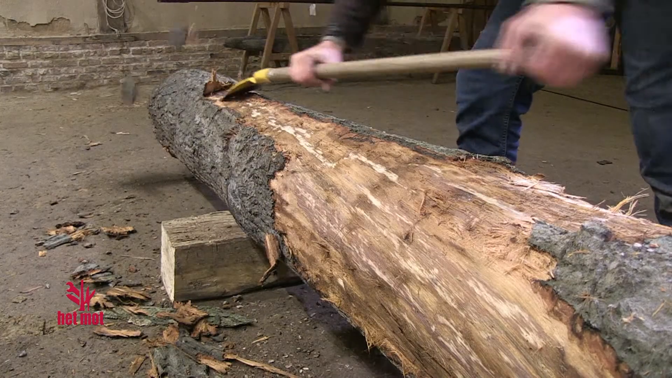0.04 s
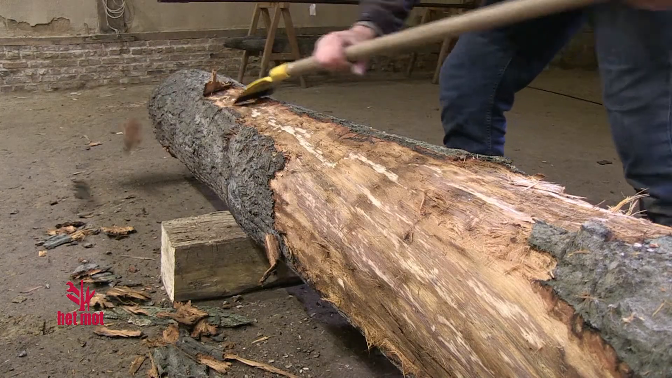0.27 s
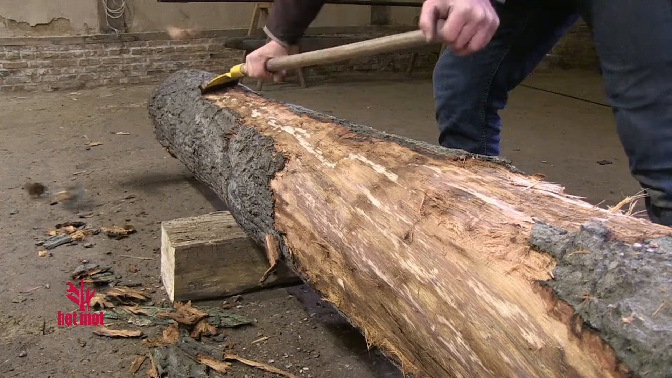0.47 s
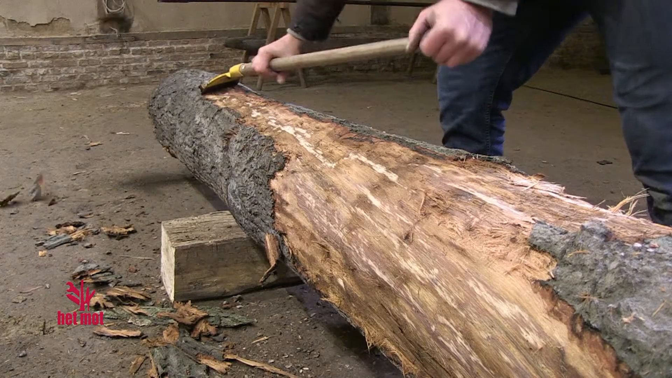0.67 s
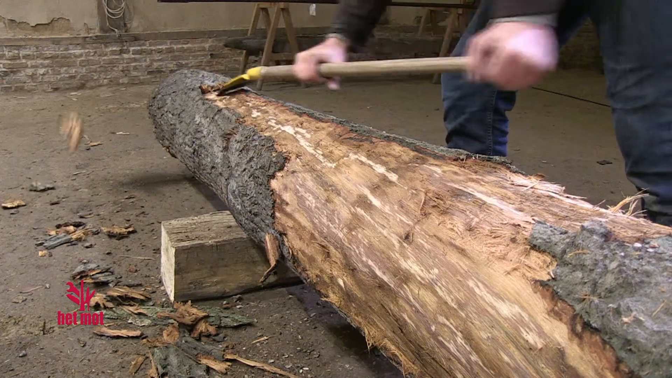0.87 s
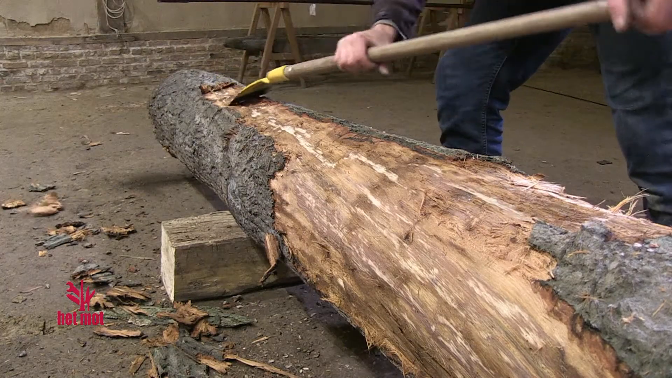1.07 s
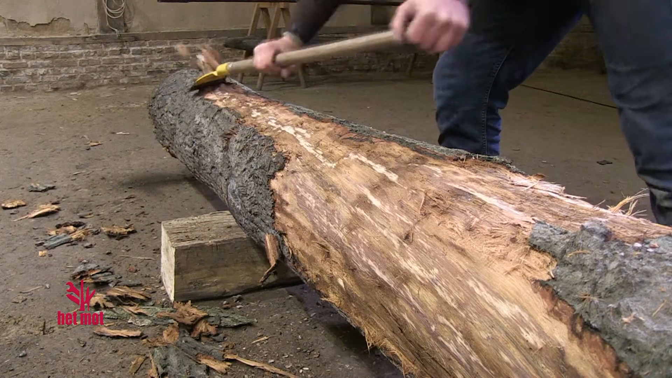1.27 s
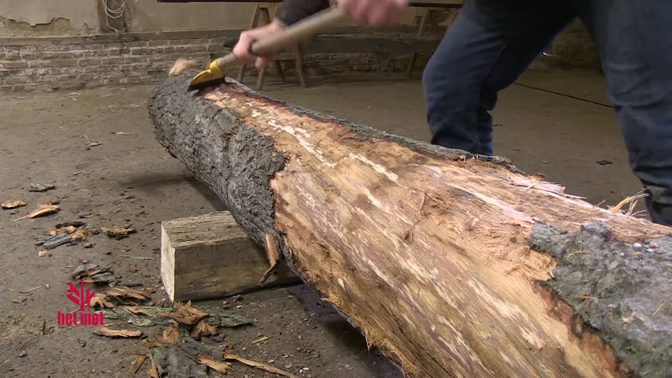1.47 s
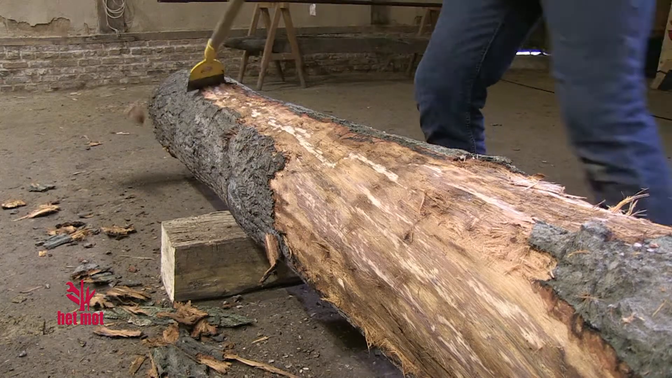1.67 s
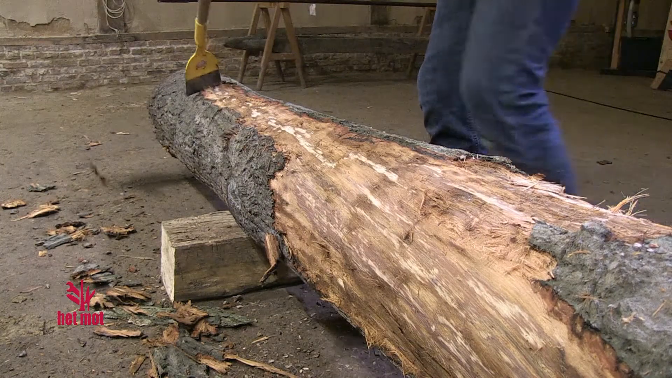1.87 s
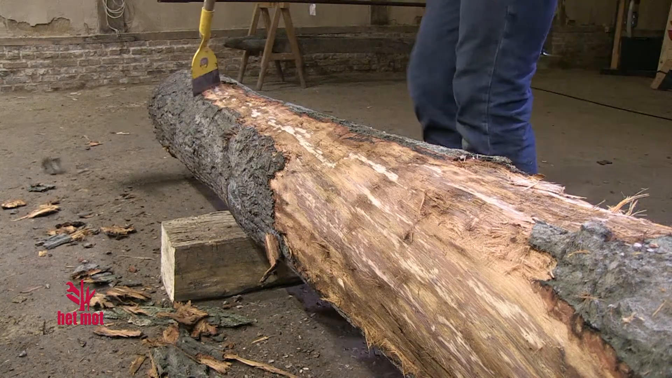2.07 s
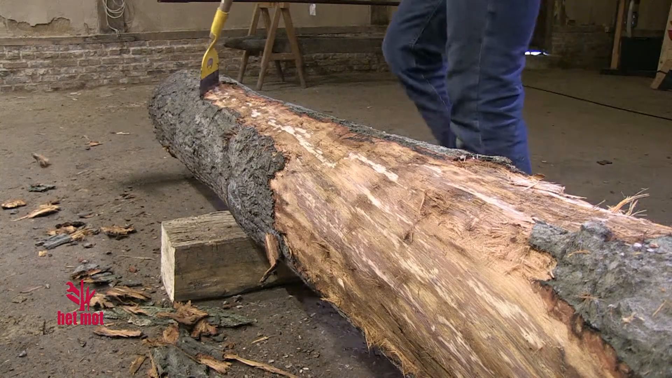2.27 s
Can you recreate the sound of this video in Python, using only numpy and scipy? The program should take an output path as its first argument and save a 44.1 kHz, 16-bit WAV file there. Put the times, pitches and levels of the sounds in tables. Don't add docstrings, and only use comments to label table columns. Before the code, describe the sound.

Two short, rasping spade pushes tear crackling bark off a log, each with a metallic squeal and dull knock; light back-drags precede them, then chips tick and shoes scuff quietly. Close microphone, hard-walled room.

```python
import sys
import numpy as np
from scipy import signal
from scipy.fft import rfft, irfft
from scipy.io import wavfile
from scipy.ndimage import uniform_filter1d

SR = 44100
rng = np.random.default_rng(int(sys.argv[2]) if len(sys.argv) > 2 else 0)


def volts_from_decibels(level):
    exponent = np.asarray(level, float) / 20
    return 10 ** exponent


def materialize(psi):
    bounded = np.clip(np.atleast_2d(psi).T, -1, 1)
    quanta = np.round(bounded * 32767).astype(np.int16)
    wavfile.write(sys.argv[1], SR, quanta)


N = 101430


def evened(x):
    return x / np.sqrt(np.mean(x ** 2) + 1e-20)


def waver(n, length):
    return evened(uniform_filter1d(rng.standard_normal(n), length))


def highpass(x, order, hz):
    return signal.sosfilt(signal.butter(order, hz, "high", fs=SR, output="sos"), x)


def thin(x):
    return highpass(x, 4, 100)


def read(points, hz):
    f, value = np.transpose(points)
    return np.interp(np.log(hz + 1), np.log(f + 1), value)


def colour(x, points):
    hz = abs(np.fft.fftfreq(4096, 1 / SR))
    octaves_below = np.maximum(np.log2(points[0][0] / (hz + 1)), 0)
    log_gain = np.log(volts_from_decibels(read(points, hz) - 4.5 * octaves_below) + 1e-5)
    taps = np.fft.ifft(np.exp(log_gain - 1j * signal.hilbert(log_gain).imag)).real[:2048]
    return signal.oaconvolve(x, taps / np.linalg.norm(taps))[:N]


def ring(x, modes, damp=0.59, shift_db=0., shift_s=.02):
    t = np.arange(3000) / SR
    taps = []
    for hz, width, db in modes:
        decay = t * np.exp(-5 * width * damp * t)
        taps.append(volts_from_decibels(db) * width ** 2 * decay * np.sin(2 * np.pi * hz * t))
    taps = np.array(taps)
    knots = np.arange(0, N / SR + 1, shift_s)
    drift = rng.standard_normal((len(knots), len(modes)))
    spot = np.array([np.interp(np.arange(N) / SR, knots, volts_from_decibels(shift_db * d)) for d in drift.T])
    fed = x * spot / np.sqrt((spot ** 2).mean())
    return signal.oaconvolve(fed, taps / np.linalg.norm(taps), axes=1)[:, :N].sum(0)


def grit(per_s, spread_db, lumpy_db, lump_s):
    hit = rng.random(N) < per_s / SR
    size = np.minimum(rng.exponential(1, N), 4)
    sign = rng.choice([-1., 1.], N)
    lump = waver(N, max(int(lump_s * SR), 1))
    return evened(hit * sign * volts_from_decibels(spread_db * size + lumpy_db * lump))


def force(strokes):
    t, main, second = np.arange(N) / SR, np.zeros(N), np.zeros(N)
    for rows in strokes:
        s, db, more_db = np.transpose(rows)
        level = np.interp(t, s, db, -140, -140)
        main += volts_from_decibels(level)
        second += volts_from_decibels(level + np.interp(t, s, more_db))
    return main, second


# (frequency [Hz], density [dB per Hz])
HUM_SPECTRUM = [(12, -20.5), (20, 5), (313, 2.5), (873, -12), (3700, -16.5), (4370, -19), (5610, -25),
                (14000, -25), (15200, -50.5)]
HUM_DB = -56


def hum():
    hz = np.fft.rfftfreq(N, 1 / SR)
    spectrum = rfft(rng.standard_normal(N)) * volts_from_decibels(read(HUM_SPECTRUM, hz)) * (hz > 18)
    return volts_from_decibels(HUM_DB + 0.5 * waver(N, 2500)) * evened(irfft(spectrum, N))


# (frequency [Hz], t60 [s])
ROOM_DECAY = [(60, 1), (300, 0.81), (1100, 0.51), (2900, 0.63), (7700, 0.49), (14000, 0.27)]
ROOM_GAP_S = 0.017


def room(x):
    taps = np.zeros(SR)
    at = np.arange(0, SR - 20, 20) + rng.integers(0, 20, SR // 20 - 1)
    taps[at] = rng.choice([-1., 1.], at.shape) * np.clip(at / SR / ROOM_GAP_S, 0, 1) ** 2
    hz, t, z = signal.stft(taps, SR, nperseg=256)
    tail = signal.istft(z * volts_from_decibels(-60 * t / read(ROOM_DECAY, hz)[:, None]), SR, nperseg=256)[1]
    return signal.fftconvolve(x, tail / np.linalg.norm(tail))[:N]


# (centre [s], half length [s], level [dB])
SHUFFLES = [
    (0.677, 0.15, -57.5),
    (1.6, 0.2, -59.5),
    (1.865, 0.042, -64.5),
    (1.934, 0.035, -57),
    (2.007, 0.11, -61.5),
]
# (frequency [Hz], density [dB per Hz])
RUSTLE = [(410, -21.5), (700, 4.5), (747, -16.5), (942, -5.5), (2040, -8), (4260, -2), (15200, -21)]


def shuffles():
    t = np.arange(N) / SR
    swell = sum(volts_from_decibels(db) * np.exp(-((t - s) / half) ** 2) for s, half, db in SHUFFLES)
    return colour(grit(5000, 4.4, 1.08, 0.0037) * swell, RUSTLE)


# (time [s], peak [dB], centre [Hz], width [Hz])
CHIPS = [(.038, -24, 1700, 2500), (.1412, -22, 700, 900), (.466, -41, 10400, 3100), (.761, -47, 7000, 6000),
         (.8035, -32, 1000, 1300), (.938, -36, 9600, 6100), (.968, -42, 9000, 6000),
         (1.016, -47, 9000, 6000), (1.117, -24, 900, 900), (1.152, -17, 800, 500),
         (1.6495, -34, 3000, 6000), (1.688, -46, 2500, 4000), (1.7505, -33.5, 256, 190),
         (1.784, -50, 3200, 2000), (1.852, -34, 3900, 5100), (1.8935, -44, 462, 150),
         (1.9145, -40, 462, 80), (1.9275, -39, 465, 110), (1.9585, -43, 150, 80), (2.083, -44, 3050, 3400)]


def chips():
    out, t = np.zeros(N + SR), np.arange(2000) / SR
    for s, db, hz, width in CHIPS:
        decay = 0.0648 * volts_from_decibels(-60 * t / 0.044) + 0.2 * volts_from_decibels(-60 * t / 0.0053)
        tail = rng.standard_normal(2000) * decay
        tail[0] = 1.3
        mode = np.exp(-np.pi * width * t[:900]) * np.sin(2 * np.pi * hz * t[:900])
        tick = highpass(np.convolve(tail, mode), 2, hz / 3)
        out[round(s * SR):][:len(tick)] += volts_from_decibels(db) * tick / abs(tick).max()
    return out[:N]


# (time [s], level [dB], frequency [Hz])
ROCKS = [
    (0.366, -36.5, 38.2),
    (1.233, -39, 39.9),
]
ROCK_RISE_S, ROCK_FALL_S, ROCK_AFTER_DB, ROCK_T60_S = .04, .03, -11, 1.1


def rocks():
    out, t = np.zeros(N + SR), np.arange(SR // 2) / SR
    late = np.maximum(t - ROCK_RISE_S, 0)
    swing = np.exp(-(late / ROCK_FALL_S) ** 2) + volts_from_decibels(ROCK_AFTER_DB - 60 * late / ROCK_T60_S)
    rise = np.sin(np.pi / 2 * np.minimum(t / ROCK_RISE_S, 1)) ** 2
    for s, db, hz in ROCKS:
        out[round(s * SR):][:len(t)] += volts_from_decibels(db) * rise * swing * np.sin(2 * np.pi * hz * t)
    return out[:N]


# (time [s], level [dB], frequency [Hz])
THUDS = [
    (0.324, -24.5, 134.7),
    (1.178, -22.5, 131.3),
]
THUD_RISE_S, THUD_T60_S, THUD_SAG_PER_S = 0.00058, 0.038, 3.3


def thuds():
    out, t = np.zeros(N + SR), np.arange(SR // 2) / SR
    cycles_per_hz = (1 - np.exp(-THUD_SAG_PER_S * t)) / THUD_SAG_PER_S
    for s, db, hz in THUDS:
        gain = volts_from_decibels(db - 60 * t / THUD_T60_S) * np.minimum(t / THUD_RISE_S, 1)
        out[round(s * SR):][:len(t)] += gain * np.sin(2 * np.pi * hz * cycles_per_hz)
    return out[:N]


# (start [s], end [s], level [dB])
BOOMS = [
    (0.279, 0.351, -35),
    (1.121, 1.194, -30.5),
]
BOOM_HZ, BOOM_RISE_S, BOOM_FALL_S, BOOM_T60_S, BOOM_AFTER_DB = 301.9, 0.011, 0.0092, 0.48, -7.5


def booms():
    t, gain = np.arange(N) / SR, np.zeros(N)
    for start, end, db in BOOMS:
        late = np.maximum(t - end, 0)
        fall = np.exp(-late / BOOM_FALL_S) + volts_from_decibels(BOOM_AFTER_DB - 60 * late / BOOM_T60_S)
        gain += volts_from_decibels(db) * np.clip((t - start) / BOOM_RISE_S, 0, 1) * fall
    drift = waver(N, 900)
    phase = 2 * np.pi * np.cumsum(BOOM_HZ * (1 + 0.014 * drift)) / SR
    return gain * volts_from_decibels(1.06 * drift) * np.sin(phase)


# (frequency [Hz], density [dB per Hz])
RASP = [(150, -37.5), (250, 6.5), (2800, 2.5), (3750, -11), (4370, 3.5), (5650, -21), (15000, -23)]


def wood_rasp(x):
    return colour(x, RASP)


# (start [s], length [s], level [dB], blade lean, rub over squeak [dB])
TOUCHES = [
    (1.67, 0.07, -53, -1.2, 2),
    (1.749, 0.027, -58.5, -1.5, -1),
    (2.107, 0.054, -58.5, 1, -7),
    (2.155, 0.22, -63.5, 0.54, -21),
]
# (frequency [Hz], width [Hz], level [dB], gain by leaning [dB])
TIP = [(2336, 23, -3, 0), (2770, 20, 1, 3), (4010, 37, -0.5, -4), (4480, 53, 1.5, 4.5), (4990, 42, -3, 14),
       (6550, 130, -4.5, -2), (7250, 32, -2.5, 9), (7800, 51, -5, 4.5), (9300, 51, -13.5, -5),
       (10750, 46, -19.5, 1.5), (12440, 47, -17.5, -1.5)]


def touches():
    t, squeak, rub = np.arange(N) / SR, np.zeros(N), np.zeros(N)
    grains = grit(3000, 1.2, 1.9, 0.0068)
    for s, length, db, lean, rub_db in TOUCHES:
        swell = np.clip(np.minimum((t - s) / 0.0041, (s + length - t) / 0.047), 0, 1)
        drive = volts_from_decibels(db) * swell * grains
        modes = [(hz, width, top + lean * gain) for hz, width, top, gain in TIP]
        squeak += ring(drive, modes, 0.97, 2.5, 0.039)
        rub += volts_from_decibels(rub_db) * drive
    return thin(squeak + wood_rasp(rub))


def wavering_tones(rows, shake):
    rise_s, wobble_db, wobble_hz = 0.0032, 0.5, 35
    t, out = np.arange(N) / SR, np.zeros(N)
    for s, length, db, hz, t60 in rows:
        at = slice(round(s * SR), round((s + length + t60) * SR))
        u = t[at] - s
        smooth = [uniform_filter1d(uniform_filter1d(v, 120), 120) for v in rng.standard_normal((2, SR))]
        level, pitch = (evened(v)[:len(u)] for v in smooth)
        fall_db = 60 * np.maximum(u - length, 0) / t60
        gain = np.clip(u / rise_s, 0, 1) * volts_from_decibels(db + wobble_db * level - fall_db)
        out[at] += gain * np.sin(2 * np.pi * np.cumsum(hz + shake * wobble_hz * pitch) / SR)
    return out


# (time [s], level [dB], frequency [Hz], t60 [s])
RINGS = [(.36, -36, 2780, 0.41), (0.35, -41.5, 1222, 0.79), (0.27, -50.5, 4300, 0.92),
         (0.31, -37, 480, 0.43), (1.2, -40, 1227, 0.43), (1.18, -37, 4350, 0.52), (1.23, -46.5, 295, .7)]


def rings():
    return wavering_tones([(s, 0, db, hz, t60) for s, db, hz, t60 in RINGS], .6)


# (start [s], length [s], level [dB], frequency [Hz])
SQUEALS = [(0, 0.011, -34.5, 4000), (0.035, 0.033, -33.5, 4005), (0.065, 0.0087, -31, 4025),
           (0.081, 0.033, -40, 4020), (.04, 0.023, -32, 1233), (0.072, 0.0092, -41, 2790),
           (0.091, 0.0097, -40.5, 2440), (0.024, 0.031, -38, 4010), (.23, 0.0064, -46, 12200),
           (0.235, 0.017, -33.5, 2750), (.249, 0.017, -19, 3946), (.264, 0.0042, -10, 3990),
           (.277, 0.05, -21, 3980), (0.281, 0.011, -21, 1198), (0.299, 0.015, -19, 6400),
           (.313, .004, -18.5, 12450), (0.228, 0.081, -28, 2750), (0.801, .008, -39.5, 6220),
           (0.825, 0.018, -44, 3910), (.909, 0.042, -36.5, 2750), (0.911, 0.048, -37, 4470),
           (.91, 0.066, -39, 2340), (0.914, 0.013, -38, 1232), (1.047, 0.0073, -46, 2750),
           (1.056, 0.084, -38.5, 4340), (1.059, .025, -37.5, 1182), (1.107, 0.023, -25, 4360),
           (1.108, 0.0051, -24.5, 2750), (1.125, 0.034, -21.5, 3970), (1.121, 0.043, -38, 8920),
           (1.122, 0.054, -28.5, 1217), (1.157, 0.0068, -26.5, 9070), (1.684, .022, -57, 4330),
           (1.718, .025, -63, 2340), (1.752, 0.023, -56.5, 4030), (2.168, 0.095, -68, 2750),
           (2.195, .04, -63.5, 4490)]
SQUEAL_T60_S = .03


def squeals():
    return wavering_tones([(*row, SQUEAL_T60_S) for row in SQUEALS], 1)


# (lowest [Hz], highest [Hz], width [Hz], tilt [dB per octave], spread [dB])
MINOR = (1999.5, 15009, 54.5, -7.5, 6.5)


def minor_modes(count):
    lo, hi, width, tilt_db, spread_db = MINOR
    hz = lo + (hi - lo) * (np.arange(count) + rng.random(count)) / count
    db = tilt_db * np.log2(hz / lo) + spread_db * rng.standard_normal(count)
    return [(f, width, level) for f, level in zip(hz, db)]


# (centre [s], swell [dB])
BITES = [(0.038, 4), (0.07, -3.5), (0.252, -25), (0.267, 3), (0.313, -4.5), (0.915, -1), (1.11, -20),
         (1.176, -1), (1.187, -4), (1.143, -5), (0.322, -1)]
BITE_S = 0.0025


def bites():
    t = np.arange(N) / SR
    return 1 + sum(volts_from_decibels(db) * np.exp(-((t - s) / BITE_S) ** 2) for s, db in BITES)


# (time [s], force [dB], wood rasp over force [dB])
DRAGS = [
    [(0, -34.5, -3.5), (.03, -41.5, -8), (.04, -35.5, -4.5), (.07, -40.5, 4), (.12, -45.5, 5),
     (.15, -56.5, 12)],
    [(.745, -58, 5.5), (.797, -51, -14), (.803, -37.5, 0), (.83, -41.5, -6), (.898, -41, -7.5),
     (.916, -35, -5), (.975, -40.5, -2), (1.0, -47.5, 1), (1.03, -67, -1)],
]
# (frequency [Hz], width [Hz], level [dB])
BLADE_FREE = [(1222, 84, -6), (2365, 21, -4), (2778, 31, -2.5), (3316, 190, -14.5), (3990, 30, -1.5),
              (4374, 43, -9), (4474, 37, -1.5), (5000, 110, -11.5)]
# (frequency [Hz], width [Hz], level [dB])
SOCKET = [(6440, 100, 5.5), (6660, 98, 1.5), (7790, 70, 1), (9450, 70, -0.5), (9700, 88, -4),
          (10700, 40, -9), (11000, 78, -5.5), (12500, 60, -8), (13200, 58, -8), (14500, 50, -12)]
SOCKET_DB, SOCKET_WAKES_DB = -10, -44


def drags():
    skate, rasp = force(DRAGS)
    drive = grit(6000, 4.0, 1.1, 0.011) * skate
    blade = ring(drive, BLADE_FREE, 0.97, 1.5, 0.022)
    awake = np.minimum(skate / volts_from_decibels(SOCKET_WAKES_DB), 1)
    socket = volts_from_decibels(SOCKET_DB) * ring(drive * awake, SOCKET, 1.0, 3, 0.012)
    return blade + socket + wood_rasp(grit(7000, 1.5, 2.0, 0.004) * rasp), drive


# (time [s], blade force [dB], bark tearing over force [dB])
PUSHES = [
    [(.18, -76, 12), (.205, -49, 13.5), (.245, -32.5, 4), (.255, -21.5, -2.5), (.28, -21, -7),
     (.312, -17, -1.5), (.33, -30, 14.5), (.338, -37.5, 17), (.358, -57, 17.5)],
    [(1.03, -63, 10), (1.05, -48.5, 8), (1.1, -30.5, -0.5), (1.145, -21, -2), (1.168, -22, -1.5),
     (1.177, -23, 1), (1.192, -32.5, 16), (1.2, -41.5, 9.5), (1.22, -57, 11)],
]
# (frequency [Hz], width [Hz], level [dB])
BLADE_LOADED = [(1242, 60, -6.5), (1460, 240, -21.5), (2455, 150, -4), (2750, 54, -0.5), (4015, 65, 1),
                (4401, 55, -0.5), (6290, 79, -8), (6617, 50, -1.5), (7180, 75, -7), (7740, 50, -11),
                (8968, 140, -8.5), (10670, 47, -18.5), (12300, 110, -14.5)]
# (frequency [Hz], density [dB per Hz])
TEAR = [(130, -54.5), (220, -0.5), (937, -4.5), (1250, 2.5), (1930, -4), (4060, -1), (12800, -21),
        (15000, -24)]
BARK_DAMP_HZ, BRIGHT_HZ, BRIGHT_PER_DB, FULL_DB = 34.8, 4600, .5, -21


def pushes():
    blade, tear = force(PUSHES)
    drive = grit(6000, 3.4, 2.0, .004) * blade
    loaded = [(hz, width + BARK_DAMP_HZ, db) for hz, width, db in BLADE_LOADED]
    cut = ring(drive, loaded, 0.99, 2.0, 0.011)
    torn = colour(grit(6000, 2.4, 1.1, 0.004) * tear, TEAR)
    treble = signal.butter(2, BRIGHT_HZ, "high", fs=SR, output="sos")
    cut_top, torn_top = signal.sosfiltfilt(treble, [cut, torn])
    bright = np.minimum(((blade + tear) / volts_from_decibels(FULL_DB)) ** BRIGHT_PER_DB, 1)
    cut -= cut_top * (1 - bright ** .5)
    torn -= torn_top * (1 - bright ** 2)
    return cut + torn, drive * bright


def spade():
    push, push_drive = pushes()
    drag, drag_drive = drags()
    minor_drive = volts_from_decibels(-12.5) * push_drive + volts_from_decibels(-13) * drag_drive
    minor = ring(minor_drive, minor_modes(30), 0.81, 6.3, 0.053)
    return bites() * thin(push + drag + minor)


ROOM_DB, SQUEAL_ROOM_DB = -15.5, -5


def scene():
    near = shuffles() + chips() + rocks() + thuds() + booms() + touches() + spade()
    sing = rings() + squeals()
    echo = volts_from_decibels(ROOM_DB) * room(near + volts_from_decibels(SQUEAL_ROOM_DB) * sing)
    return (near + sing + echo + hum())[None]


def roll_off(x):
    return signal.sosfilt(signal.butter(12, 15400, fs=SR, output="sos"), x)


def record(dry):
    edge = signal.firwin(511, 15150, window=("kaiser", 9), fs=SR)
    mix = signal.oaconvolve(dry, edge[None], "same")
    return roll_off(mix)


dry = scene()
out = record(dry)
materialize(out)
```